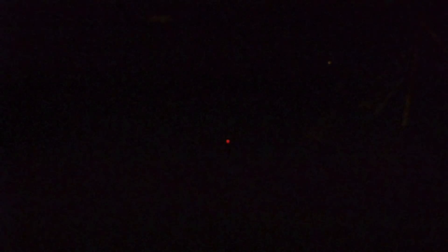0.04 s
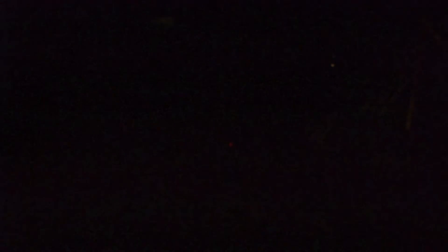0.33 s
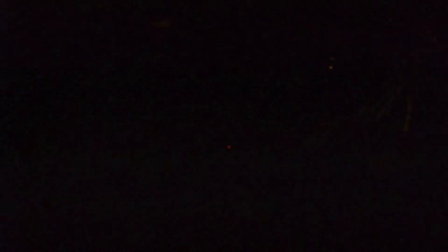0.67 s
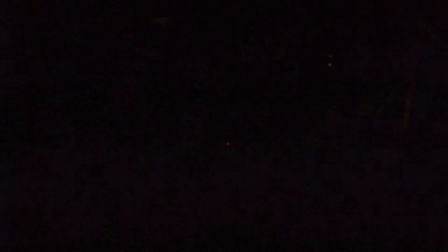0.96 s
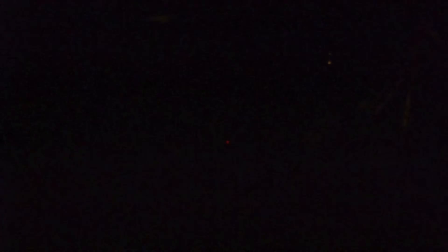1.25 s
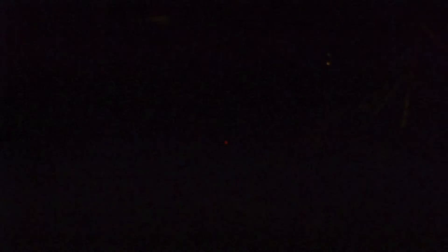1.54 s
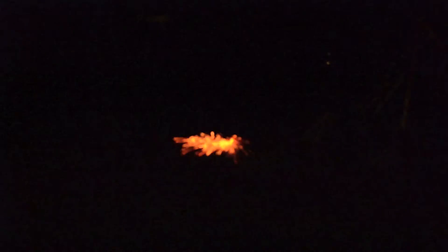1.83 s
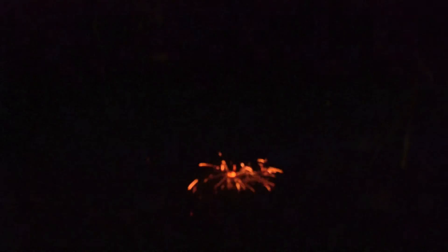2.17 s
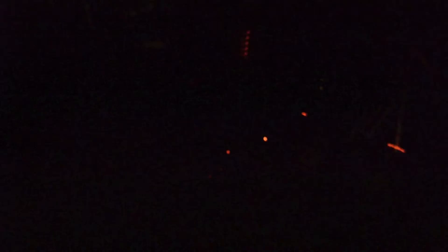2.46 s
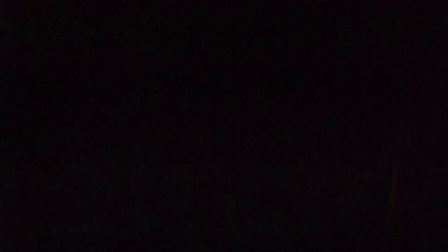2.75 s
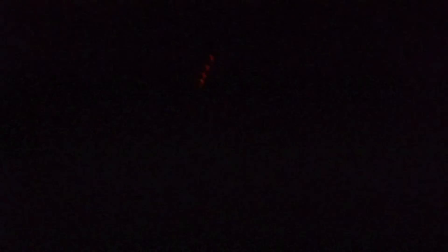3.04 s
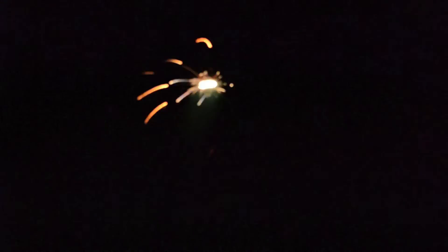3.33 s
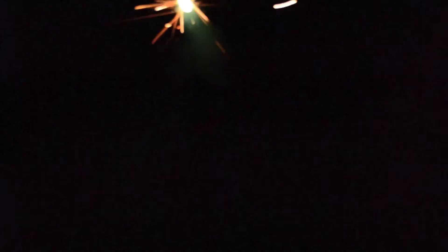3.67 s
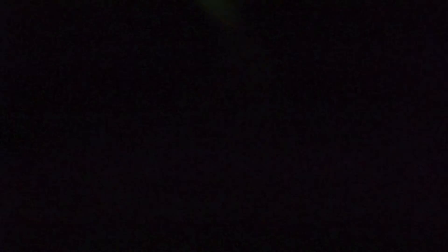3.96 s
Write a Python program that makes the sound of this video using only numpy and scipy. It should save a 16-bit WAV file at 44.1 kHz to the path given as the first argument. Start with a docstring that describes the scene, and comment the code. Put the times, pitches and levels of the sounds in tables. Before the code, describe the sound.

A spinner firework catches after a quiet moment outdoors at night, rushing into a loud, fluttering hiss with sharp spark cracks. It sags briefly, then surges again, while light wind bumps the microphone.

```python
"""Outdoors in a yard at night: a spinner firework catches on the ground, whirls up, sags, catches again.
Its jet sweeps past the microphone once a turn, so hiss and roar flutter at the spin rate.
Sparks crackle in the jet and lumps of the charge spit. Wind eddies buffet the microphone.
Behind it all: a faint distant wash, an insect-like trill and, early on, two small scrapes."""
import sys
import numpy as np
from scipy import signal
from scipy.fft import rfft, irfft
from scipy.io import wavfile
from scipy.ndimage import uniform_filter1d

SR = 44100
rng = np.random.default_rng(int(sys.argv[2]) if len(sys.argv) > 2 else 0)


def inscribe(sig):
    """Save sig as 16-bit PCM at rate SR to the path in sys.argv[1].

    A 1-D sig is mono; a 2-D sig holds one channel per row.
    Samples are clipped to [-1, 1] before scaling.
    """
    pcm = np.round(np.clip(np.atleast_2d(sig).T, -1, 1) * 32767)
    wavfile.write(sys.argv[1], SR, pcm.astype(np.int16))


N = 176400
TIME_S = np.arange(N) / SR
FREQ_HZ = np.fft.rfftfreq(N, 1 / SR)

# Distant wash. Each row: frequency in Hz, relative density in dB.
NIGHT_SPECTRUM = [(20, -8), (60, -1), (150, -6.5), (400, -6), (750, 2.5), (1100, 1), (1600, -4.5),
                  (2300, -16), (3300, -22.5), (4500, -22), (7000, -28), (12000, -37)]
# Far-off trill. Each row: centre in Hz, width in Hz, level in dB.
TRILL_BANDS = [(2650, 120, -73.5), (3050, 83, -78)]
# Gusts on the microphone. Each row: centre in seconds, half length in seconds, level in dB.
GUSTS = [(0.447, 0.019, -46.5), (0.52, 0.028, -48), (.66, 0.042, -48), (0.7, 0.027, -40.5),
         (0.761, 0.026, -48), (0.822, 0.018, -45.5), (0.936, .025, -44.5), (1.002, 0.084, -53),
         (1.268, 0.042, -51.5), (1.502, 0.063, -48.5), (1.676, 0.1, -54), (1.85, 0.05, -45),
         (2.039, 0.031, -41.5), (2.113, 0.022, -38.5), (2.18, 0.043, -44.5), (2.348, 0.09, -45.5),
         (2.423, 0.048, -40.5), (2.542, 0.033, -30.5), (2.592, 0.045, -29.5), (2.66, 0.029, -41),
         (2.721, 0.021, -29.5), (2.806, 0.035, -39), (2.892, 0.054, -48), (2.971, 0.033, -37),
         (3.078, 0.033, -46.5), (3.157, 0.028, -42), (3.236, 0.034, -41), (3.942, 0.07, -54.5)]
# Rumble between eddies. Each row: frequency in Hz, relative density in dB.
RUMBLE_SPECTRUM = [(30, -13), (90, -0.5), (180, 4.5), (320, -10), (550, -15.5), (1000, -49), (3000, -70)]
# Lone hard eddies. Each row: centre in seconds, level in dB.
BUFFETS = [(0.81, -34), (1.235, -36), (1.2688, -35), (1.29, -37.5), (1.509, -35), (2.1932, -25.5),
           (2.417, -23.5), (2.5806, -21.5), (2.752, -17), (2.968, -25.5)]
# Spin rate. Each row: time in seconds, rate in turns per second.
SPIN_HZ = [(1.9, 10), (1.98, 23), (2.1, 85), (2.21, 145), (2.29, 161), (2.47, 151), (2.6, 128), (2.8, 110),
           (2.97, 105), (3.2, 86), (3.38, 102), (3.62, 123), (4.0, 127)]
# Jet swing, once and twice a turn. Each row: time in seconds, signed depth in dB.
TURN_SWING_DB = [(1.9, 1.5), (2.0, 2), (2.1, 2.5), (2.25, 2), (2.6, -1.5), (2.85, 0.5), (3.25, 1),
                 (3.5, 1.9), (4.0, 1.5)]
HALF_TURN_SWING_DB = [(1.9, -1), (2.1, 1.6), (2.3, 1.5), (2.48, -1.5), (2.75, 1), (2.95, 2), (3.25, 2),
                      (3.5, 1.2), (4.0, 0.9)]
# Jet hiss and lower flame roar. Each row: time in seconds, level in dB.
HISS_DB = [(1.6, -89), (1.62, -67), (1.66, -54.5), (1.682, -61), (1.715, -46), (1.77, -37), (1.87, -38.5),
           (1.94, -34.5), (2.04, -29), (2.1, -25), (2.18, -27.5), (2.34, -30.5), (2.485, -30),
           (2.53, -38.5), (2.6, -35.5), (2.8, -36), (2.99, -39), (3.06, -45.5), (3.11, -40.5), (3.19, -39),
           (3.2, -33), (3.235, -30), (3.41, -30), (3.47, -28.5), (3.62, -27), (3.72, -29), (3.96, -26.5),
           (4.0, -30)]
ROAR_DB = [(1.63, -69), (1.72, -52), (1.785, -40.5), (1.86, -46), (1.935, -39), (2.0, -32.5), (2.1, -30.5),
           (2.16, -32.5), (2.22, -41.5), (2.35, -46), (2.97, -47), (3.05, -51.5), (3.18, -53),
           (3.22, -45.5), (3.58, -48), (3.625, -38.5), (3.68, -48), (4.0, -53)]
# Spits of the charge and cracks of single sparks. Each row: start in seconds, onset level in dB.
SPITS = [(1.773, -38), (1.994, -22.5), (2.002, -26), (3.0894, -32)]
CRACKS = [(2.047, -20), (2.0625, -18), (2.0755, -17), (2.1415, -22.5), (2.967, -28), (3.625, -25.5),
          (3.978, -22.5)]
# Spectra of the burning. Each row: frequency in Hz, relative density in dB.
HISS_SPECTRUM = [(100, -52), (400, -18.5), (900, -10), (2000, -6.5), (3200, -3), (5500, 0.65), (7000, 1.2),
                 (9000, 0.13), (12000, -4)]
ROAR_SPECTRUM = [(100, -21), (450, -7), (900, -6), (1400, 0), (1900, 2), (2300, -2), (2900, 1),
                 (4200, -8.5), (6500, -22), (12000, -18)]
SPIT_SPECTRUM = [(200, -7), (1500, 2), (4000, -6), (10000, -6)]
CRACK_SPECTRUM = [(200, -14), (1400, 1.5), (3300, -1.5), (9000, -14)]
# Microphone response. Each row: frequency in Hz, gain in dB.
MIC_RESPONSE = [(20, -0.5), (7400, 0.5), (7900, -5), (8350, 3), (9400, 4), (10000, 0), (10500, -6.5),
                (11000, -19), (11500, -32)]


def amp(db):
    """Decibels to gain."""
    return 10 ** (np.asarray(db) / 20)


def unit(x):
    """Scale to rms 1."""
    return x / np.sqrt(np.mean(x ** 2) + 1e-20)


def curve(points):
    """Breakpoints to one value per sample."""
    return np.interp(TIME_S, *np.transpose(points))


def colour(x, spectrum):
    """Filter by a spectrum on a log-frequency axis; rms 1."""
    hz, db = np.transpose(spectrum)
    gain = amp(np.interp(np.log(FREQ_HZ + 1), np.log(hz), db))
    return unit(irfft(rfft(x) * gain, N))


def band(hz, width_hz):
    """Noise in one bell-shaped band; rms 1."""
    bell = np.exp(-2 * ((FREQ_HZ - hz) / width_hz) ** 2)
    return unit(irfft(rfft(rng.standard_normal(N)) * bell, N))


def night(start_db=-55.5, rise_db_per_s=0.25, waver_db=0.52):
    """Wavering distant wash and a thin trill, as of insects."""
    level_db = start_db + rise_db_per_s * TIME_S + waver_db * band(0, 8)
    wash = amp(level_db) * colour(rng.standard_normal(N), NIGHT_SPECTRUM)
    trill = sum(amp(db) * band(hz, width_hz) for hz, width_hz, db in TRILL_BANDS)
    return wash + trill


def scrapes(first_s=0.246, second_s=0.41, rise_s=0.024, ring_hz=1876):
    """A small scrape rasps and rings; a softer rasp follows."""
    def swell(start_s):
        age = np.maximum(TIME_S - start_s, 0) / rise_s
        return age * np.exp(1 - age)
    ring = amp(-53.5) * unit(np.sin(2 * np.pi * ring_hz * TIME_S + band(0, 60)))
    rasp = amp(-61.5) * band(3050, width_hz=1000)
    return swell(first_s) * (ring + rasp) + amp(-6) * swell(second_s) * rasp


def eddy(offset_s, hz, skew):
    """Pressure of a passing eddy: a dip between two lopsided rises."""
    u = np.pi * hz * offset_s
    return np.exp(-u ** 2) * (2 * u ** 2 - 1 + skew * u)


def wind(eddies_per_s=190, base_hz=159.5, top_hz=365, octaves_per_db=0.14, spread_db=4.5, calm_db=-73):
    """Eddies push and pull on the microphone over a low rumble; stronger gusts make each quicker."""
    power = sum(amp(db) ** 2 * np.exp(-2 * ((TIME_S - centre_s) / half_s) ** 2)
                for centre_s, half_s, db in GUSTS)
    gust = np.sqrt(power + amp(calm_db) ** 2)
    rumble = colour(rng.standard_normal(N), RUMBLE_SPECTRUM)
    pressure = np.zeros(N)
    draws = rng.standard_normal((int(eddies_per_s * N / SR), 4))
    for k, (late, quick, size, skew) in enumerate(draws):
        at = int(np.clip((k + 0.5 * late) / eddies_per_s * SR, 0, N - 1))
        gust_db = 20 * np.log10(gust[at])
        octaves = octaves_per_db * (gust_db + 45) + 0.6 * quick
        hz = top_hz * np.tanh(base_hz * 2 ** octaves / top_hz)
        near = slice(max(at - SR // 50, 0), at + SR // 50)
        pressure[near] += amp(spread_db * size) * eddy(TIME_S[near] - at / SR, hz, skew)
    local_rms = np.sqrt(np.maximum(uniform_filter1d(pressure ** 2, size=1400), 1e-6))
    return gust * (amp(-0.5) * pressure / local_rms + amp(-4.5) * rumble)


def buffets(base_hz=205, octaves_per_db=0.018):
    """Lone strong eddies bump the microphone, quicker when harder."""
    pressure = np.zeros(N)
    skews = rng.uniform(-1.3, 1, len(BUFFETS))
    for (centre_s, db), skew in zip(BUFFETS, skews):
        hz = base_hz * 2 ** (octaves_per_db * (db + 31.5))
        pressure += amp(db) * eddy(TIME_S - centre_s, hz, skew)
    return pressure


def burn(spectrum, sparks_per_s=2200, spread_db=3.5, spark_to_gas_db=-5.5):
    """Turbulent gas with the clicks of bursting sparks; rms 1."""
    sizes = amp(spread_db * np.minimum(rng.exponential(1, N), 4.2))
    signs = rng.choice([-1, 1], N)
    fires = rng.random(N) < sparks_per_s / SR
    sparks = amp(spark_to_gas_db) * unit(sizes * signs * fires)
    return colour(rng.standard_normal(N) + sparks, spectrum)


def jet(sputter_db=0.85, sputter_width_hz=162):
    """Hiss and roar swell each time the nozzle swings round."""
    angle = 2 * np.pi * np.cumsum(curve(SPIN_HZ)) / SR
    beam = amp(curve(TURN_SWING_DB) * np.cos(angle) + curve(HALF_TURN_SWING_DB) * np.cos(2 * angle))
    beam /= np.sqrt(uniform_filter1d(beam ** 2, size=2000))  # flutter at constant mean power
    sputter = amp(sputter_db * band(0, sputter_width_hz))
    hiss = amp(curve(HISS_DB)) * burn(HISS_SPECTRUM)
    roar = amp(curve(ROAR_DB)) * burn(ROAR_SPECTRUM)
    return beam * sputter * (hiss + roar)


def bursts(rows, decay_s):
    """Envelope: instant onsets, exponential decays."""
    return sum(amp(db) * (TIME_S >= start_s) * np.exp(-abs(TIME_S - start_s) / decay_s)
               for start_s, db in rows)


def spits():
    """Lumps of the charge flare in short puffs."""
    return bursts(SPITS, decay_s=0.0033) * burn(SPIT_SPECTRUM)


def cracks():
    """Single sparks burst, shorter and lower than the spits."""
    return bursts(CRACKS, decay_s=0.0012) * burn(CRACK_SPECTRUM)


def yard(x, tail_db=-14, t60_s=0.28, build_s=0.0098):
    """The open yard adds a thin scattered tail."""
    t = TIME_S[:SR // 2]
    tail = rng.standard_normal(len(t)) * amp(-60 * t / t60_s) * (1 - np.exp(-t / build_s))
    return x + amp(tail_db) * signal.fftconvolve(x, tail / np.linalg.norm(tail))[:N]


def scene():
    """Firework in the yard, background and wind; mono."""
    firework = yard(jet() + spits() + cracks())
    return (firework + night() + scrapes() + wind() + buffets())[None]


def record(dry):
    """Low cut, microphone response, band limit."""
    low_cut_hz, band_limit_hz = 57.5, 11520
    x = signal.sosfilt(signal.butter(2, low_cut_hz, "high", fs=SR, output="sos"), dry[0])
    hz, db = np.transpose(MIC_RESPONSE)
    grid_hz = np.linspace(0, SR / 2, 513)
    mic = signal.firwin2(257, grid_hz, amp(np.interp(grid_hz, hz, db)), fs=SR)
    x = signal.oaconvolve(x, mic, "same")
    low_pass = signal.firwin(1023, band_limit_hz, window=("kaiser", 9), fs=SR)
    return signal.oaconvolve(x, low_pass, "same")[None]


dry = scene()
out = record(dry)
inscribe(out)
```